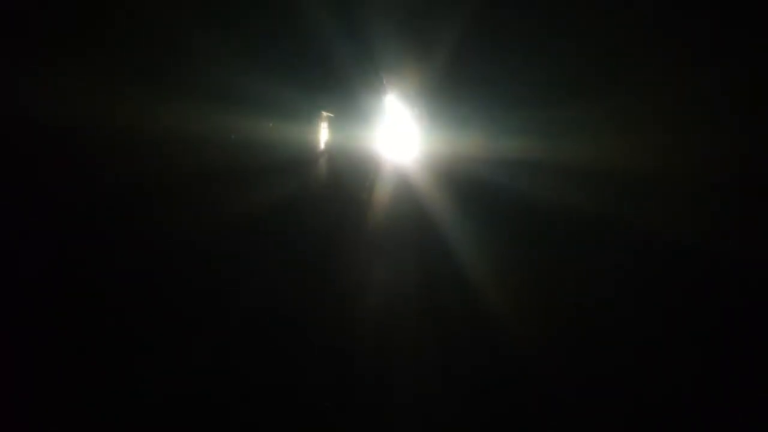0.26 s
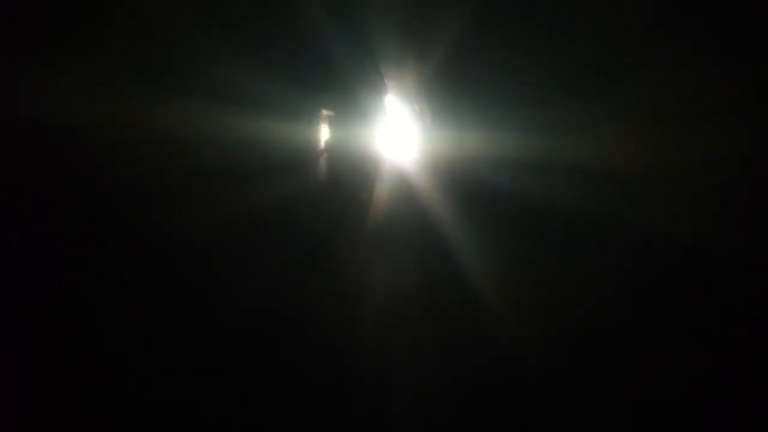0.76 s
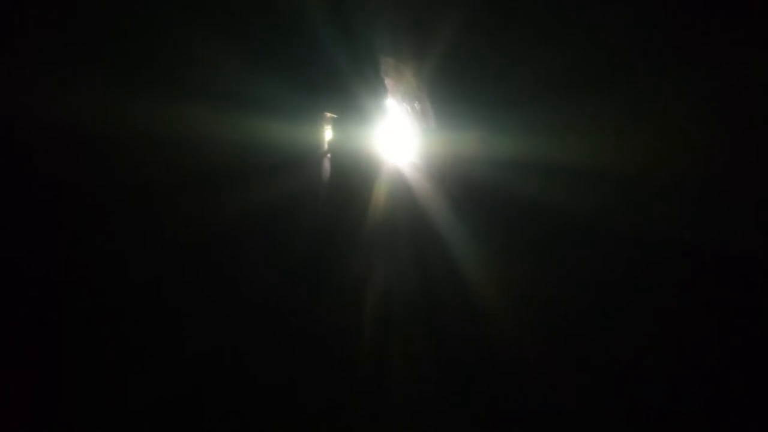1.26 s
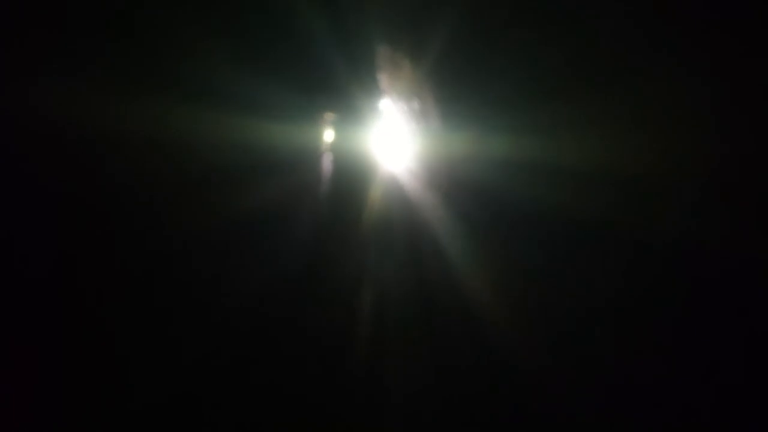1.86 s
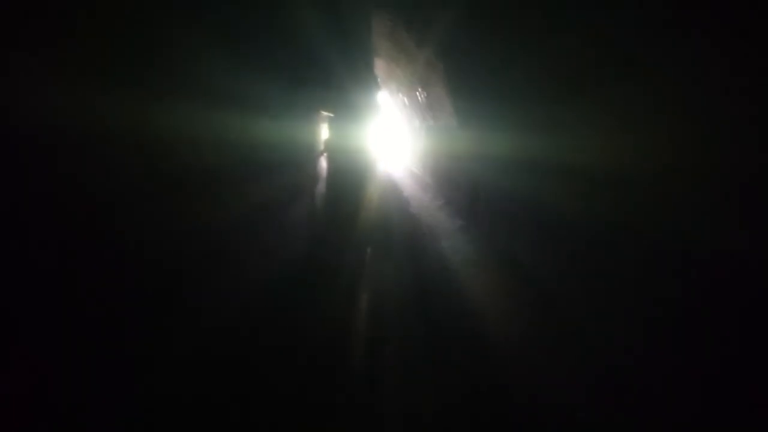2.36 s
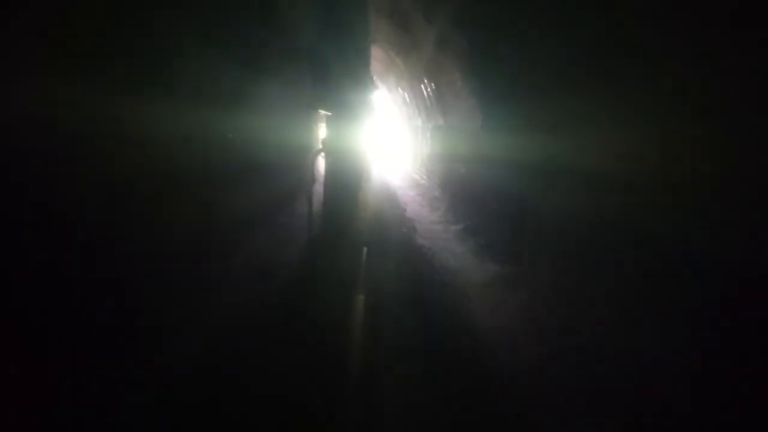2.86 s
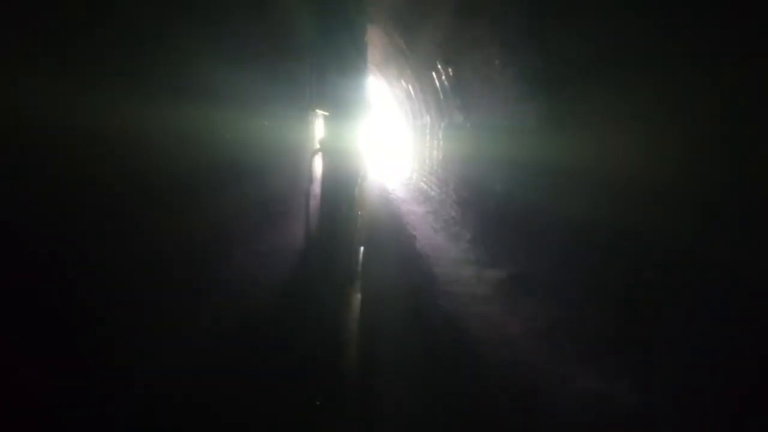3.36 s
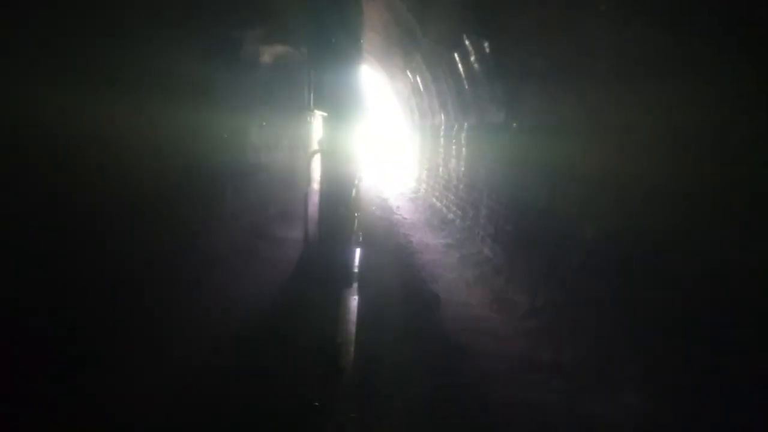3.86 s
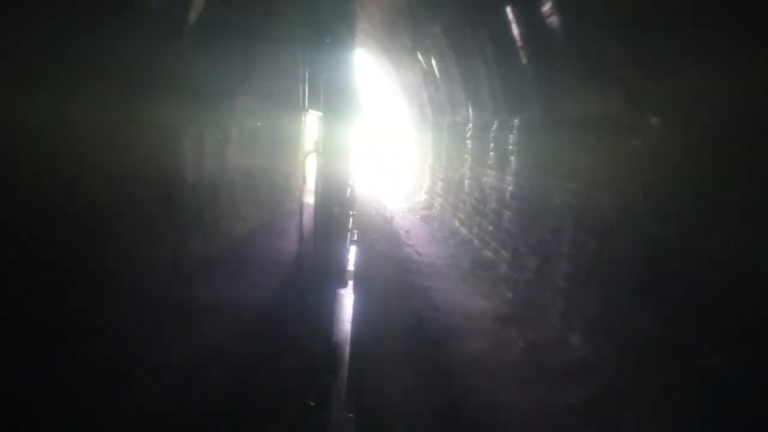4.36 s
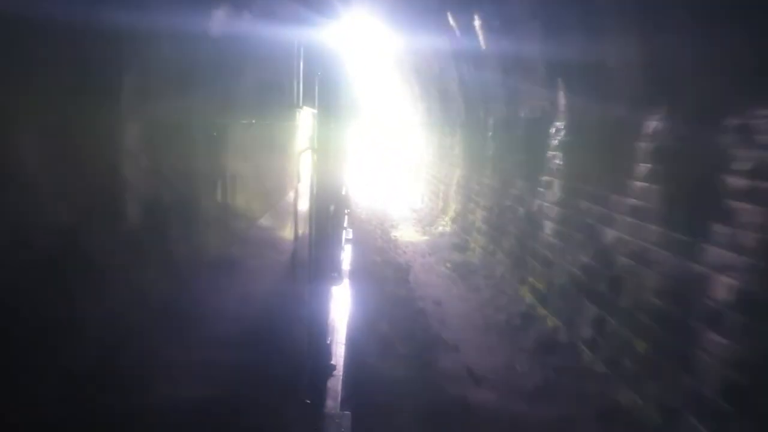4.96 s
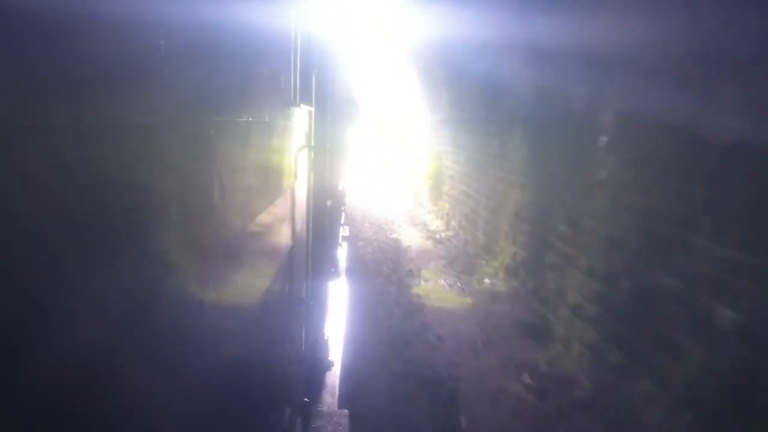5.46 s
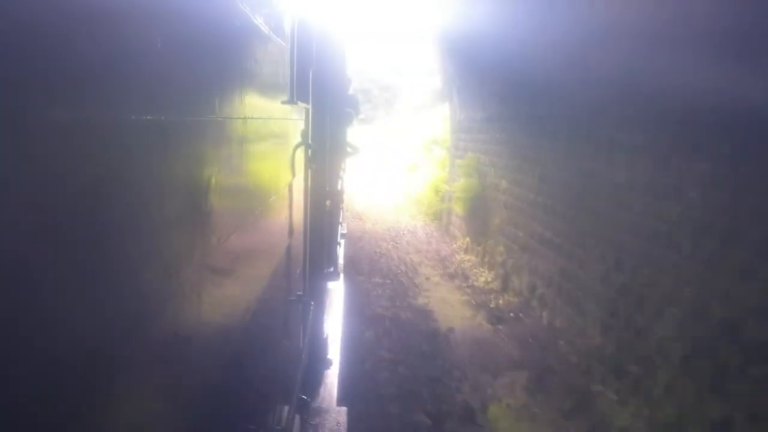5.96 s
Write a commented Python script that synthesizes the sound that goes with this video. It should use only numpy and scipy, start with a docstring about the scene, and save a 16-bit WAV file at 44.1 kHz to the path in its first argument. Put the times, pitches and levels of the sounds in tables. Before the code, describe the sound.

A diesel locomotive runs through a tunnel, heard close from on board. From the start, a deep exhaust drone throbs and surges, booming off the walls over a continuous low rumble and rail roar. Irregular wheel knocks and short steel clanks come several times a second. Between about 1.7 and 3.5 seconds the engine eases, with one last surge near 2.9. A faint, high turbocharger whine slowly falls throughout, above a faint gear whine. From about 2.9 to 3.3 seconds the air horn gives one short, hoarse toot, starting low and jumping to a higher two-note blast. From 2.6 seconds onward, axles pound harder over rail joints, strongest around 3.3, 3.7, 4.0 and 4.6 to 5.5 seconds, with clangs, hollow panel booms and bright rattles of loose fittings. Near 6.1 seconds another knock brings a tiny steel squeak as the rolling continues.

```python
"""A booming diesel exhaust and roaring wheels, heard from aboard a locomotive heading out of a tunnel.
The firings drone through the silencer, then ease; the turbocharger winds down and the gears whine faintly.
Axle after axle pounds over rail joints: the bogies clang, body panels boom, loose steel fittings rattle.
Midway the air horn gives one short, hoarse toot; near the end steel squeaks once."""
import sys
import numpy as np
from scipy import signal
from scipy.fft import rfft, irfft
from scipy.io import wavfile
from scipy.ndimage import uniform_filter1d, map_coordinates

SR = 44100
rng = np.random.default_rng(int(sys.argv[2]) if len(sys.argv) > 2 else 0)


def generate_wav(signal):
    """Clip the signal to [-1, 1] and save it as 16-bit WAV at the path in sys.argv[1]."""
    frames = np.transpose(np.atleast_2d(signal))
    scaled = np.clip(frames, -1, 1) * 32767
    pcm = np.round(scaled).astype(np.int16)
    wavfile.write(sys.argv[1], SR, pcm)


N = 274297
TIME = np.arange(N) / SR
FREQ = np.maximum(np.fft.rfftfreq(N, 1 / SR), 1)
FIRING_HZ = 74.57

# engine effort, as exhaust level: t/s, level/dB
ENGINE_EFFORT = [(0, -18.5), (1.65, -19), (2.35, -22.5), (2.85, -22.5), (3.5, -25), (6.22, -25)]
# spectrum of struck bogie steel: f/Hz, level/dB
CLANG_SPECTRUM = [(200, -2.5), (420, 1.5), (800, 1), (1150, -7.5), (1700, -14.5), (2300, -16.5),
                  (3500, -28.5), (5000, -32), (10000, -70)]
# spectrum of loose fittings: f/Hz, level/dB
CHINK_SPECTRUM = [(2500, -11), (4500, 10.5), (6500, 6), (8300, -5), (9500, -8.5), (11200, 10), (12500, -2),
                  (14300, -10)]


def undb(db):
    """Decibels to gain."""
    return 10 ** (np.asarray(db) / 20)


def unit(x):
    """Scale to rms 1."""
    return x / np.sqrt(np.mean(x ** 2))


def over_time(table):
    """Table columns at every sample."""
    times_s, *columns = np.transpose(table)
    return [np.interp(TIME, times_s, c) for c in columns]


def over_pitch(table, hz=FREQ):
    """Table columns, interpolated in log frequency."""
    points_hz, *columns = np.transpose(table)
    return [np.interp(np.log(hz), np.log(points_hz), c) for c in columns]


def colour(x, spectrum, extra_db=0):
    """Impose a spectrum; rms 1."""
    return unit(irfft(rfft(x) * undb(over_pitch(spectrum)[0] + extra_db), N))


def noise():
    """Independent white noise from two directions."""
    return rng.standard_normal((2, N))


def walk(rate_hz):
    """Smooth random curve; rms 1."""
    return unit(irfft(rfft(rng.standard_normal(N)) / (1 + (FREQ / rate_hz) ** 4), N))


def narrow_noise(hz, width_hz):
    """Noise band around a steady or moving pitch, from two directions."""
    phase = 2 * np.pi * np.cumsum(hz * np.ones(N)) / SR
    return np.array([walk(width_hz) * np.cos(phase) + walk(width_hz) * np.sin(phase) for _ in range(2)])


def tunnel(x, wet_db, t60_s):
    """Direct sound plus a dense wall tail, different in each direction."""
    tail = rng.standard_normal((2, SR)) * undb(-60 * TIME[:SR] / t60_s)
    tail /= np.sqrt(np.sum(tail ** 2, axis=1, keepdims=True))
    wet = signal.fftconvolve(x, tail, axes=1)[:, :N]
    return (x + undb(wet_db) * wet) / np.sqrt(1 + undb(2 * wet_db))


def body_db():
    """Peaks and dips the body adds to low sounds."""
    # resonances of body and wall gap: f/Hz, width/Hz, gain/dB
    resonances = [(146.3, 13, 5), (179, 9.2, 1), (193, 61, 3), (235, 30, 7), (261.5, 94, -7),
                  (264.8, 3.6, 7), (312.2, 8.5, -4.5), (305.7, 42, 4.5)]
    return sum(db / (1 + (2 * (FREQ - hz) / width_hz) ** 2) for hz, width_hz, db in resonances)


def steel_db(spacing_hz, spread_db):
    """Crowded modes of steel: random spectral peaks and dips."""
    heights = rng.standard_normal(2000)
    return spread_db * np.interp(FREQ / spacing_hz, np.arange(len(heights)), heights)


def drift(x, depth=.03, rate_hz=1.2):
    """Resonances wander as the gap to the wall changes."""
    position = np.cumsum(1 + depth * walk(rate_hz))
    return np.array([map_coordinates(side, [position], order=1, mode="mirror") for side in x])


def exhaust(firing_cycles, scatter_db=2, gas_db=-19, drone_db=-8.5, surge_s=.043):
    """Firings drone; uneven pulses and gas noise boom through the silencer and down the tunnel."""
    # pipe and silencer response: f/Hz, gain/dB
    silencer = [(20, -50), (32, -39), (55, 11.5), (74, -6), (90, 12.5), (112, 13.5), (150, -6.5),
                (240, -19), (330, -23.5), (420, -21), (900, -36), (2500, -94)]
    # brief swells and sags: t/s, change/dB
    surges = [(0.04, 3.5), (0.27, 4), (0.375, -1), (0.67, 7), (0.85, -0.5), (1.115, -1), (1.2, 4.5),
              (1.39, 0.5), (1.67, 6), (2.85, 9)]
    firings = np.flatnonzero(np.diff(np.floor(firing_cycles)) > 0)
    pulses = np.zeros(N)
    pulses[firings] = undb(scatter_db * rng.standard_normal(len(firings)))
    flow = unit(pulses - pulses.mean()) + undb(gas_db) * noise()
    boom = colour(tunnel(flow, wet_db=-2.5, t60_s=1.0), silencer)
    stack_drone = undb(drone_db) * np.sqrt(2) * np.cos(2 * np.pi * firing_cycles)
    wall_throb = narrow_noise(FIRING_HZ, width_hz=9)
    sound = boom + stack_drone + wall_throb
    # fast beats stay; the slow swell comes from effort and surges alone
    sound /= np.sqrt(uniform_filter1d(sound ** 2, size=SR // 7, axis=1))
    surge_db = sum(db * np.exp(-((TIME - at_s) / surge_s) ** 2) for at_s, db in surges)
    return sound * undb(over_time(ENGINE_EFFORT)[0] + surge_db)


def wheels(firing_cycles, rumble_follow=.36, flutter_db=1.1, throb=.077):
    """Rough steel rolls on steel: the body rumbles, the rails roar, the roar throbs with the firings."""
    # rail roughness, as rolling level: t/s, level/dB
    roughness = [(0, -27.5), (1.7, -27.5), (1.9, -27.5), (2.88, -27), (3.05, -22.5), (3.25, -22),
                 (3.42, -27.5), (4.35, -27.5), (4.8, -27.5), (5.25, -26.5), (5.35, -28.5), (5.8, -27.5),
                 (6.22, -23)]
    # body rumble: f/Hz, level/dB
    rumble_spectrum = [(18, -44), (32, 1), (55, -6), (100, 8.5), (145, 4), (200, 3.5), (335, 7),
                       (390, -8.5), (520, -13), (900, -61)]
    # rail roar: f/Hz, level/dB
    roar_spectrum = [(150, -12), (400, 1.5), (570, 2.5), (700, -2), (900, -6), (1100, -10), (1500, -13),
                     (2200, -18), (3400, -27.5), (5000, -32.5), (7000, -38.5), (8300, -59), (11000, -44),
                     (14000, -77)]
    rolling_db = over_time(roughness)[0]
    rumble_db = -20 + rumble_follow * (rolling_db - rolling_db.mean())
    rumble = drift(colour(noise(), rumble_spectrum, body_db())) * undb(rumble_db)
    roar = colour(noise(), roar_spectrum, steel_db(spacing_hz=40.57, spread_db=2.4))
    roar *= undb(rolling_db + 1 + flutter_db * walk(6))
    return rumble + roar * (1 + throb * np.cos(2 * np.pi * firing_cycles))


def turbo(whine_width_hz=180, hiss_width_hz=620, intake_hz=6150, intake_db=-60, intake_follow=.96):
    """Falling blade whine, smeared by the walls, over intake hiss."""
    # turbocharger run-down: t/s, f/Hz, level/dB
    run_down = [(0, 8100, -57.5), (1, 7620, -61.5), (2, 7000, -58.5), (3, 6540, -58.5), (3.8, 6580, -55),
                (4.4, 6350, -55), (5, 6020, -55.5), (5.6, 5750, -56.5), (6.22, 5530, -56)]
    hz, db = over_time(run_down)
    hiss_share = np.clip((hz - 6600) / 700, 0, .9)  # at full speed the whine breaks up
    whine = np.sqrt(1 - hiss_share) * narrow_noise(hz, whine_width_hz)
    hiss = np.sqrt(hiss_share) * narrow_noise(hz - hiss_width_hz / 2, hiss_width_hz)
    intake = undb(intake_db + intake_follow * (db - db.mean())) * narrow_noise(intake_hz, hiss_width_hz)
    return undb(db) * (whine + hiss) + intake


def gears(hz=918, full_load_db=-42):
    """Drive gears whine under load, smeared by the walls."""
    effort_db = over_time(ENGINE_EFFORT)[0]
    return undb(full_load_db + effort_db - effort_db.max()) * narrow_noise(hz, width_hz=14)


def fittings(mean_db=-71, flurry_db=7, rise_db_per_s=.7):
    """Handrails and latches rattle in flurries that grow towards the tunnel mouth."""
    level_db = mean_db + rise_db_per_s * (TIME - TIME.mean()) + flurry_db * np.tanh(walk(6))
    return colour(noise(), CHINK_SPECTRUM) * undb(level_db)


def blows(speed_m_s=7, axle_gap_m=2.56, bogie_gap_m=10.28, rear_bogie_db=-.18, chink_db_per_db=4.2):
    """Wheel blows, four axles a joint plus further knocks: t/s, blow/dB, chink/dB, decay/s."""
    # rail joints: first axle t/s, blow/dB, chink/dB, decay/s, extra on a bogie's second axle/dB
    joints = [(0.665, -25, -79, 0.084, 0), (2.596, -24, -42, 0.046, 0.6), (3.256, -19, -45, 0.058, -10),
              (3.624, -18.5, -46, 0.098, 1.5), (3.83, -37, -51.5, 0.095, -0.5),
              (4.454, -28.5, -57.5, 0.39, -20), (4.582, -19, -37, 0.031, -0.5)]
    # further wheel knocks, some alone, some landing on rail-joint blows: t/s, blow/dB, chink/dB, decay/s
    wheel_knocks = [(0.105, -29, -60, 0.07), (0.22, -23.5, -63, 0.07), (0.635, -26, -62, 0.06),
                    (1.045, -28, -64, 0.05), (1.128, -42, -37.5, 0.03), (1.255, -28, -63, 0.06),
                    (1.475, -29, -70, 0.05), (1.72, -27, -70, 0.04), (2.16, -27, -70, 0.06),
                    (2.32, -28, -59, 0.05), (2.52, -24.5, -66, 0.03), (3.11, -26.5, -47, 0.12),
                    (4.15, -34, -53, 0.08), (4.3, -34, -55, 0.06), (4.725, -26, -53, 0.07),
                    (5.92, -25, -60, 0.06), (6.055, -22, -44, 0.06), (6.17, -23, -62, 0.025)]
    rows = []
    for at_s, blow_db, chink_db, decay_s, second_axle_db in joints:
        for bogie in range(2):
            for axle in range(2):
                lag_s = (bogie * bogie_gap_m + axle * axle_gap_m) / speed_m_s
                extra_db = bogie * rear_bogie_db + axle * second_axle_db
                axle_chink_db = chink_db + chink_db_per_db * extra_db
                rows.append((at_s + lag_s, blow_db + extra_db, axle_chink_db, decay_s))
    return [row for row in rows + list(wheel_knocks) if row[0] < TIME[-1]]


def rattle(strikes_per_s=200, ring_s=.009, scatter_db=3, smear=.5):
    """Envelope of loose steel striking at random, partly smeared by the walls; rms near 1."""
    hits = rng.random(N) < strikes_per_s / SR
    energy = hits * undb(2 * scatter_db * np.clip(rng.standard_normal(N), -2, 2))
    power = signal.lfilter([1], [1, -np.exp(-2 / (ring_s * SR))], energy) + 1e-9
    return np.sqrt(smear + (1 - smear) * power / uniform_filter1d(power, size=SR // 12))


def jolts(lead_in_s=.05, decay_power=.99):
    """Each blow thuds in the body, clangs in the bogie and rattles rigging and loose fittings."""
    # body thud: f/Hz, level/dB
    thud_spectrum = [(30, -3), (80, 5), (150, 10.5), (220, 9), (310, 16), (400, 8), (600, -2), (900, -40),
                     (2500, -90)]
    # rigging clatter: f/Hz, level/dB
    clatter_spectrum = [(1200, -24), (2400, 1), (3500, -14.5), (5000, -15.5), (7000, -13), (10000, -33)]
    # rows: thud, clang, clatter, chink
    delay_s = np.array([[.006], [.014], [.014], [.018]])
    rise_s = np.array([[.0065], [.0065], [.0065], [.01]])
    decay_scale = np.array([[1], [1], [.9], [.85]])
    power = np.zeros((4, N))
    for at_s, blow_db, chink_db, decay_s in blows():
        start = int((at_s - lead_in_s) * SR)
        t = TIME[:min(SR, N - start)] - lead_in_s
        rise = 1 / (1 + np.exp((delay_s - t) / rise_s))  # the wheel dips into the joint
        fall = np.exp(-(np.maximum(t, 0) / (decay_s * decay_scale)) ** decay_power)
        clatter_db = (blow_db + chink_db) / 2 - 2.5  # a blow that shakes nothing loose stays dull
        gains = undb([[blow_db + 2.5], [blow_db], [clatter_db], [chink_db]])
        power[:, start:start + len(t)] += (gains * rise * fall) ** 2
    thud, clang, clatter, chink = np.sqrt(power)
    bogie = colour(noise(), CLANG_SPECTRUM, steel_db(spacing_hz=45, spread_db=1.3))
    rigging = colour(noise(), clatter_spectrum, steel_db(spacing_hz=60, spread_db=2))
    loose_steel = colour(noise(), CHINK_SPECTRUM, steel_db(spacing_hz=70, spread_db=3))
    body = drift(colour(noise(), thud_spectrum, body_db()))
    return thud * body + clang * bogie + rattle() * (clatter * rigging + chink * loose_steel)


def panels(swell_s=.014, waver=.04, scatter_db=2):
    """At each blow the loose body panels swell over a few cycles and die away."""
    # panel modes: f/Hz, level re blow/dB
    modes = [(114.6, -8), (148, -9), (223, -11), (272, -10), (312, -8), (582, -12)]
    out = np.zeros(N)
    bend = 1 + waver * walk(32)
    for at_s, blow_db, _, _ in blows():
        start = int(at_s * SR)
        t = TIME[:min(SR // 4, N - start)]
        span = slice(start, start + len(t))
        bent_s = np.cumsum(bend[span]) / SR
        envelope = (t / swell_s * np.exp(1 - t / swell_s)) ** 2
        for hz, db in modes:
            gain = np.sqrt(2) * undb(blow_db + db + scatter_db * rng.standard_normal())
            out[span] += gain * envelope * np.sin(2 * np.pi * (hz * bent_s + rng.random()))
    return out


def clanks(detune=.015, scatter_db=2.5, crack_db=-3, crack_s=.025, rise_s=.005):
    """Brake rigging and couplings knock: a crack and a short ring, different each time."""
    # steel-on-steel knocks: t/s, level/dB
    knocks = [(0.245, -27.5), (0.502, -31), (0.67, -29), (1.084, -31.5), (1.265, -32), (1.498, -32),
              (1.772, -26.5), (2.165, -29), (2.593, -27), (3.655, -25), (4.008, -23.5), (4.47, -30),
              (4.557, -28), (4.6, -28), (4.726, -25), (4.963, -26), (5.11, -28), (5.478, -26), (6.07, -26)]
    # rigging modes: f/Hz, level/dB, t60/s
    modes = [(590, -4, .12), (813, -1, .11), (1077, 0, .09), (1290, -5, .12), (1437, -4, .14),
             (1593, -5, .14), (1793, -3, .14), (2030, -5, .13), (2245, -5, .13), (2525, -10, .11),
             (2842, -12, .1)]
    hz, mode_db, t60_s = np.transpose(modes)[:, :, None]
    out = np.zeros((2, N))
    crack_noise = colour(noise(), CLANG_SPECTRUM)
    for at_s, db in knocks:
        start = int(at_s * SR)
        t = TIME[:min(SR // 5, N - start)]
        span = slice(start, start + len(t))
        gains = undb(mode_db + scatter_db * rng.standard_normal(hz.shape))
        detuned_hz = hz * (1 + detune * rng.standard_normal(hz.shape))
        cycles = detuned_hz * t + rng.random((2, len(hz), 1))
        partials = gains * undb(-60 * t / t60_s) * np.sin(2 * np.pi * cycles)
        ring = partials.sum(axis=1) / np.sqrt(np.sum(gains ** 2) / 2)
        crack = undb(crack_db) * np.exp(-t / crack_s) * crack_noise[:, span]
        contact = 1 - np.exp(-t / rise_s)
        out[:, span] += undb(db) * contact * (ring + crack)
    return tunnel(out, wet_db=-3, t60_s=.35)


def panel_booms(sag_hz_per_s=660):
    """A single jolted panel booms out, sagging in pitch as its swing dies down."""
    # booms: peak t/s, f/Hz, level/dB, half-width/s
    booms = [(1.752, 335, -20, .025), (2.158, 298, -20, .02), (3.268, 112, -16.5, .042),
             (3.66, 146, -21, .035), (4.965, 215, -19, .009), (4.02, 330, -21, .035),
             (5.115, 291, -16.5, .028), (5.487, 274, -16.5, .035)]
    out = np.zeros(N)
    for peak_s, hz, db, width_s in booms:
        t = TIME - peak_s
        phase = 2 * np.pi * (hz * t - sag_hz_per_s * t ** 2 / 2)
        out += undb(db) * np.exp(-(t / width_s) ** 2) * np.sqrt(2) * np.sin(phase)
    return out


def horn(edge_s=.041, waver=.0058, rough_db=2.8, rasp_rad=.07, harmonics=10):
    """The horn speaks low and hoarse as the air comes on, then sounds its two notes for an instant."""
    # notes: start/s, end/s, f/Hz, level/dB
    notes = [(2.92, 3.04, 283.5, -25.5), (3.109, 3.19, 403.5, -20.5), (3.117, 3.215, 663, -24),
             (3.185, 3.29, 281.3, -36)]
    # horn flare response: f/Hz, gain/dB
    flare = [(280, -16), (400, 5.5), (565, -4), (660, 6), (830, 2), (1130, -15), (1320, -16), (1615, -12.5),
             (2000, -18), (2400, -22), (4500, -43)]
    out = np.zeros(N, complex)
    for start_s, end_s, hz, db in notes:
        gate = np.clip((TIME - start_s) / edge_s, 0, 1) * np.clip((end_s - TIME) / edge_s + 1, 0, 1)
        on = gate > 0
        phase = 2 * np.pi * np.cumsum(hz * (1 + waver * walk(46)[on])) / SR
        flutter = unit(undb(rough_db * walk(70)[on]))
        for k in range(1, harmonics + 1):
            jitter_rad = rasp_rad * walk(130)[on]
            partial = np.exp(1j * (k * (phase + jitter_rad) + 2 * np.pi * rng.random()))
            out[on] += gate[on] * flutter * undb(db + over_pitch(flare, k * hz)[0]) * partial
    return tunnel(np.sqrt(2) * np.array([out.real, out.imag]), wet_db=-15, t60_s=.3)


def squeak(width_hz=90):
    """A jolted fitting slips briefly, steel on steel."""
    # slips: peak t/s, f/Hz, level/dB, half-width/s
    slips = [(6.062, 6400, -43, .009)]
    return sum(undb(db) * np.exp(-((TIME - peak_s) / width_s) ** 2) * narrow_noise(hz, width_hz)
               for peak_s, hz, db, width_s in slips)


def stereo_image(field, left_lead_rad=.44):
    """Stereo image by pitch: bass nearly centred, mids lean left, highest treble leans right."""
    # stereo image: f/Hz, correlation/-1..1, left minus right/dB
    image = [(60, 0.99, -2.5), (147, 0.97, 0), (325, 1, 3), (570, 0.75, 8), (725, 0.073, 7),
             (1150, -0.49, 6), (1550, -0.44, 6.5), (2320, 0.33, 8), (3440, -0.22, 5), (6800, 0.91, 7.5),
             (8950, 0.3, -12), (11300, 0.84, -1.5)]
    correlation, left_db = over_pitch(image)
    correlation = np.clip(correlation, -.999, .999)
    first, second = rfft(field)
    shared = correlation * np.exp(-1j * left_lead_rad / (1 + (FREQ / 3000) ** 2))
    own = np.sqrt(1 - correlation ** 2)
    left = undb(left_db) * first
    right = shared * first + own * second
    mid_gain = np.hypot(np.abs(undb(left_db) + shared), own) / 2
    return irfft(np.array([left, right]) / mid_gain, N)


def scene(unsteady=.032):
    """Engine, running gear and horn, in stereo."""
    firing_cycles = np.cumsum(FIRING_HZ * (1 + unsteady * walk(14.62))) / SR
    running_gear = (wheels(firing_cycles) + jolts() + clanks() + panels() + panel_booms()
                    + fittings() + squeak())
    engine = exhaust(firing_cycles) + turbo() + gears()
    return stereo_image(engine + running_gear + horn())


def record(dry, cutoff_hz=14200, fade_s=.003):
    """The microphone colours the sound; the recorder rounds the highest peaks and cuts the top treble."""
    # microphone response: f/Hz, gain/dB
    response = [(16, -15), (33, 1), (5000, -1), (6500, 1.5), (7300, -2.5), (8300, -6), (9300, 8),
                (11000, 1), (12300, 5.5), (13300, 4.5), (14300, -16)]
    heard = irfft(rfft(dry) * undb(over_pitch(response)[0]), N)
    rounded = heard / (1 + heard ** 6) ** (1 / 6)
    fade = np.clip(np.minimum(TIME, TIME[-1] - TIME) / fade_s, 0, 1)
    lowpass = signal.ellip(10, .2, 80, cutoff_hz, fs=SR, output="sos")
    return signal.sosfilt(lowpass, rounded * fade)


dry = scene()
out = record(dry)
generate_wav(out)
```